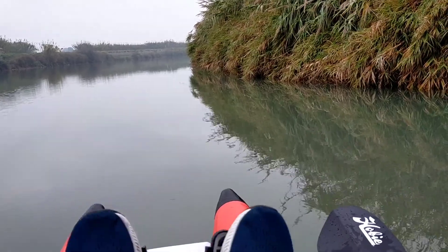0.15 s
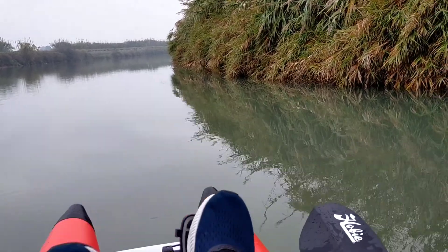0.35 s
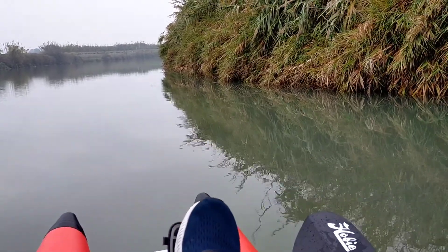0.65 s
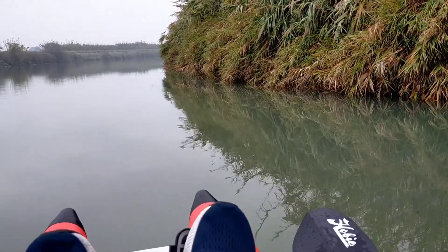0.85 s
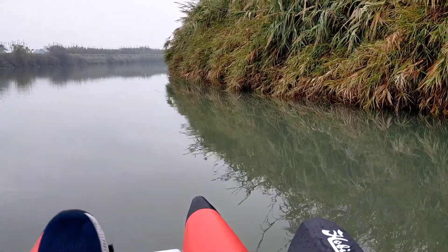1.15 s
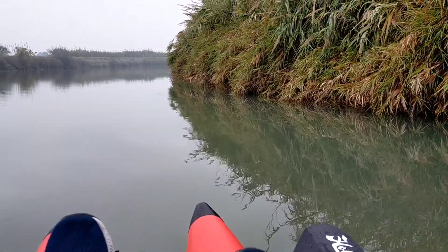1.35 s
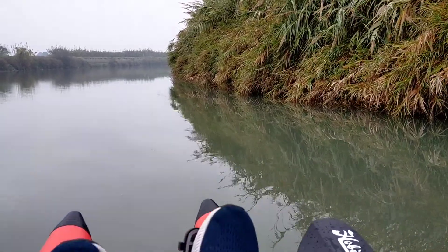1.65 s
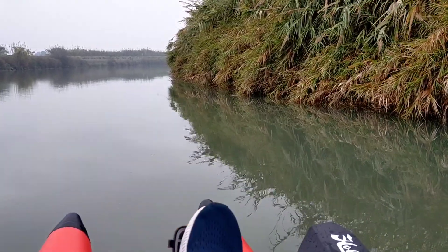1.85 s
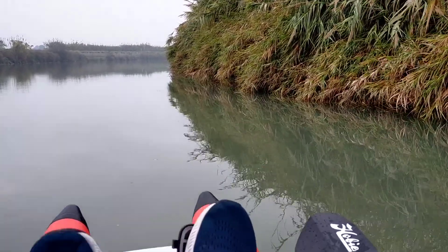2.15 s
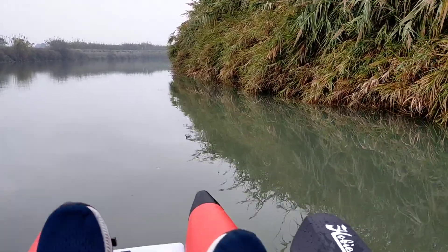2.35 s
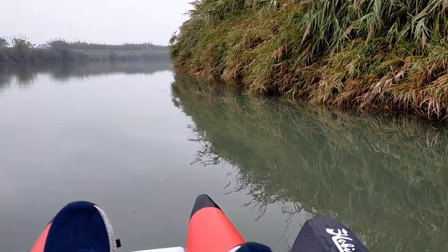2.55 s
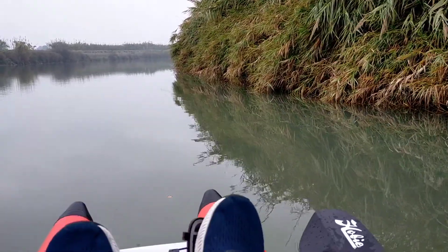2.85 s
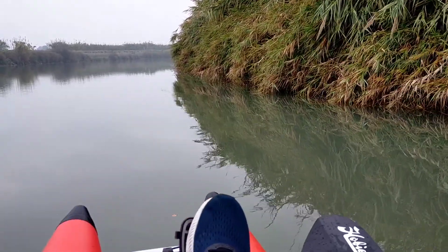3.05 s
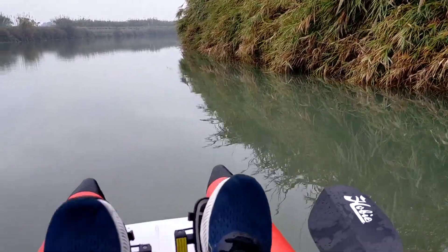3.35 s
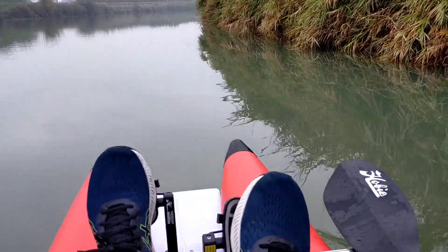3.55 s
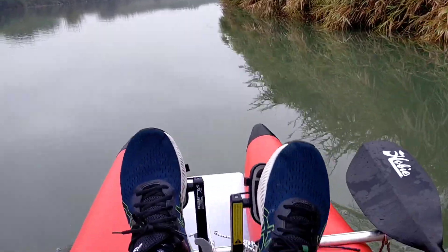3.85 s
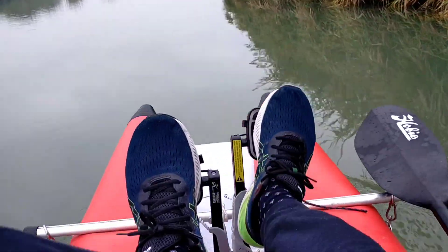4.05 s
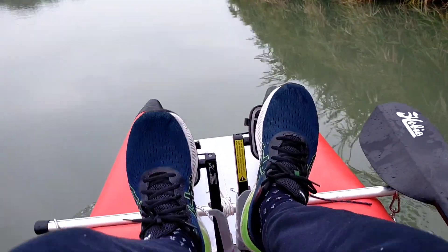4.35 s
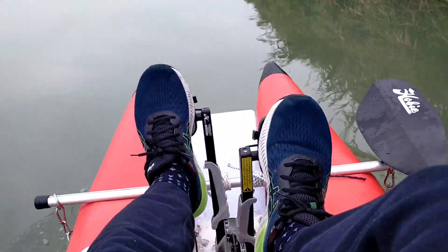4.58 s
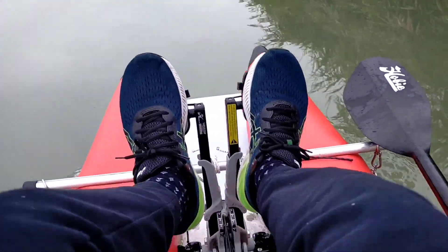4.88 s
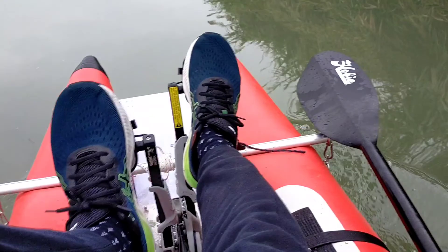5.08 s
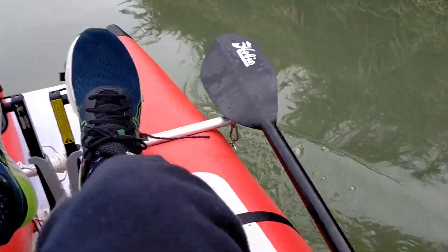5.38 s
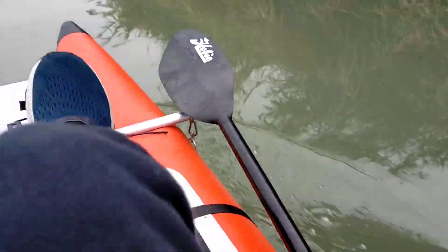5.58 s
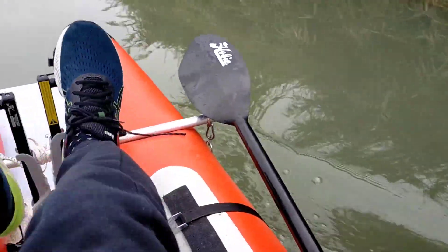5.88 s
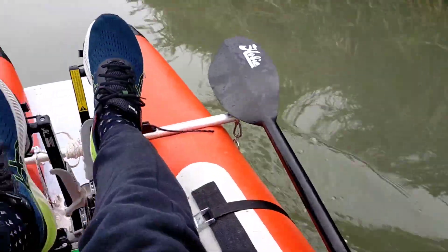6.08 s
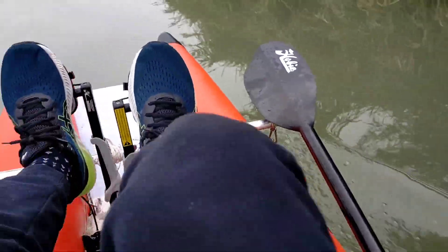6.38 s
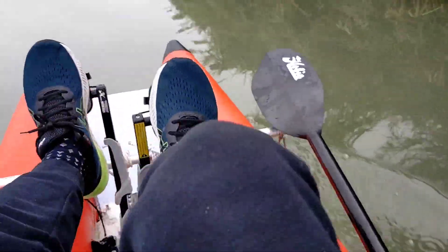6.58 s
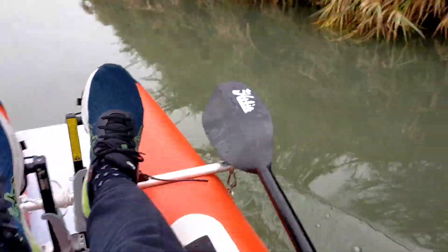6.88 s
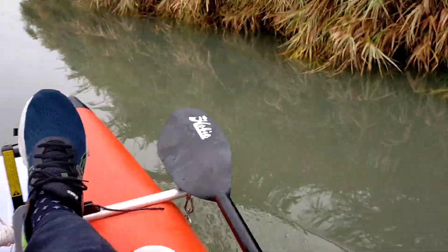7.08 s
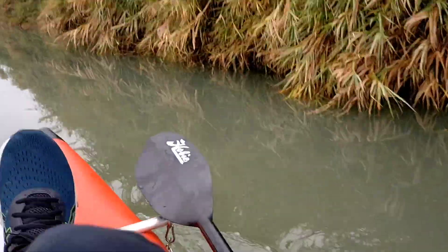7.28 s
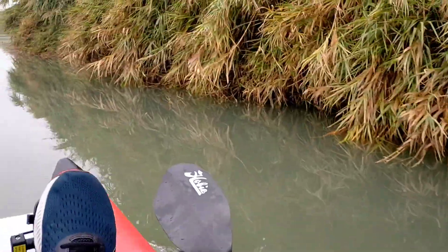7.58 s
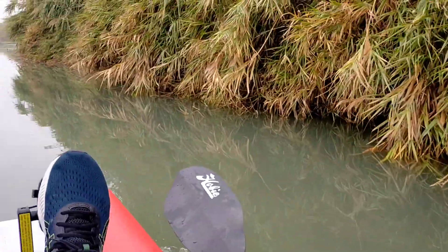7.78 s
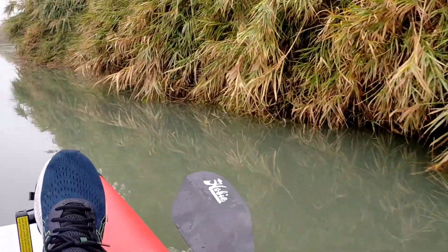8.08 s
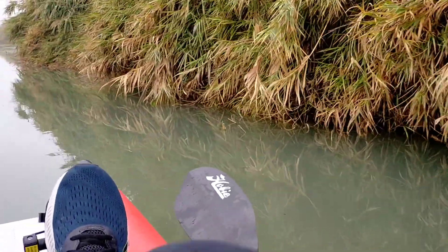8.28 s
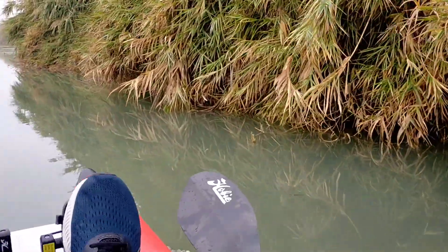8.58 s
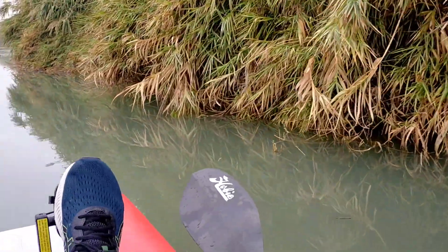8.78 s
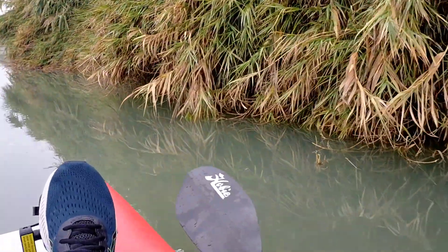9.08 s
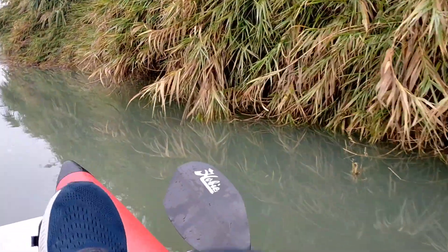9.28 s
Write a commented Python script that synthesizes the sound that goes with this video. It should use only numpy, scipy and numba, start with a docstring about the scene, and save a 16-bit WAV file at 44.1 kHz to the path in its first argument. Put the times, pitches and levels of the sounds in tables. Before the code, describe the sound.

Outdoors on a calm river, a microphone at the seat of an inflatable pedal boat. From 0 s, low wind rumble and quick, fluttering buffets press on the microphone in irregular gusts, densest until about 4.5 s. Beneath them the wake babbles softly along the pontoons, with an opening gurgle, small plops, fine spray and distant river murmur. Short, dry, woody pedal-drive knocks come near 0, 1.4, 1.7, 2.6, 3.8 (strongest), 4.7, 5.7, 6.6, 7.6 and 8.5 s. From 3 to 5.5 s the wake grows louder and closer; a faint hiss passes around 4 to 5 s, and low bubbles gulp between the hulls, with a fuller gurgle near 5.2 s. Faint rising glugs occur near 5.9, 6.8 and 8.1 s. Wind eases after 5 s, with shorter gusts around 7.3 and 8.1 s. Clear plops stand out at 7.7 and 8.4 s; wind swells again from 8.8 s until the end at 9.4 s.

```python
"""A pedal boat on two inflatable pontoons glides along a calm river, heard from the seat.
From the start bubbles resonate in the wake, air gurgles under the hulls, spray ticks, the river murmurs
and eddies of wind press on the microphone. The slack pedal drive knocks, exciting damped modes; larger
bubbles plop and droplets tick and ring. The wake then grows louder; from about 4 s a faint band of noise
fades in and out and low bubbles gulp between the hulls; from about 6 s air pockets glug, rising in pitch."""
import sys
import numpy as np
from scipy import signal
from scipy.fft import rfft, irfft, next_fast_len
from scipy.io import wavfile
from scipy.ndimage import uniform_filter1d
from numba import njit

SR = 44100
rng = np.random.default_rng(int(sys.argv[2]) if len(sys.argv) > 2 else 0)


def generate_wav(signal):
    """Clip the signal to [-1, 1] and save it as 16-bit WAV at the path in sys.argv[1]."""
    frames = np.transpose(np.atleast_2d(signal))
    scaled = np.clip(frames, -1, 1) * 32767
    pcm = np.round(scaled).astype(np.int16)
    wavfile.write(sys.argv[1], SR, pcm)


N = 415863
TIME = np.arange(N) / SR

# spectrum of the fine spray and of droplet impacts: (frequency [Hz], relative density [dB per Hz])
SPRAY_SPECTRUM = [(2800, -15), (4200, -6.5), (5500, -8), (6600, -3), (7700, -0.5), (9000, -10),
                  (10000, -9.5), (11500, -8), (13000, -5.5), (14300, 0), (15300, 5.5), (16000, 0.5)]


def undb(db):
    """Amplitude gain is ten to the power of decibels over twenty."""
    return 10 ** (np.asarray(db) / 20)


def unit(x):
    """Normalisation: divide a signal by its root mean square."""
    return x / np.sqrt(np.mean(x ** 2))


def curves(table):
    """Linear interpolation: each column after the time becomes one value per sample."""
    seconds, *columns = np.transpose(table)
    return [np.interp(TIME, seconds, column) for column in columns]


def colour(x, spectrum):
    """Linear filtering: shape a sound in frequency, falling 12 dB per octave above the last point; rms 1."""
    hz, db = np.transpose(spectrum)
    f = np.maximum(np.arange(N // 2 + 1) * SR / N, 1)
    rolloff = np.minimum(hz[-1] / f, 1) ** 2
    gain = undb(np.interp(np.log(f), np.log(hz), db)) * rolloff
    # zero padding keeps the end of the sound from wrapping round to its start
    size = next_fast_len(N + SR // 10, True)
    gain = np.interp(np.arange(size // 2 + 1) * SR / size, f, gain)
    return unit(irfft(rfft(x, size) * gain, size)[:N])


def walk(rate):
    """Low-pass noise: random levels, about rate [1/s] of them, smoothed into a wander of spread 1."""
    k = max(int(SR / rate), 2)
    steps = np.repeat(rng.standard_normal(N // 20)[:N // k + 1], k)
    return unit(uniform_filter1d(steps, k)[:N])


def swell(start, hold, attack, release):
    """Piecewise-linear envelope [s]: reaches 1 at the start after its attack, holds and falls away."""
    corners = start + np.array([-attack, 0, hold, hold + release])
    return np.interp(TIME, corners, [0, 1, 1, 0])


@njit
def ring(start, hz, cycles, size, glide):
    """Bubble resonance: each swells, decays with a time constant in cycles and rises in pitch."""
    out = np.zeros(N)
    for k in range(len(start)):
        life = cycles[k] / hz[k] * SR  # time constant in samples
        first, phase = int(start[k] * SR), 0.
        for i in range(max(min(int(9 * life), N - first), 0)):
            age = i / life
            phase += 2 * np.pi * hz[k] / SR * (1 + glide * age)
            out[first + i] += size[k] * age * np.exp(1 - age) * np.sin(phase)
    return out


def bubbles(count, low_hz, high_hz, cycles, scatter_db, glide):
    """Superposition: a cloud of bubble resonances between two pitches, a few much stronger than the rest."""
    when, pitch, damping, strength = rng.random((count, 4)).T
    hz = low_hz + (high_hz - low_hz) * pitch
    rings = cycles * 2 ** (2 * damping - 1)  # up to twice or down to half
    level_db = -scatter_db * np.log(strength + .01)
    size = undb(level_db) * np.sqrt(hz / rings)
    return ring(when * N / SR, hz, rings, size, glide)


def single_bubbles(table, cycles, glide):
    """Damped resonance of separate bubbles, one per row of (time [s], peak [dB], starting pitch [Hz])."""
    seconds, db, hz = np.array(table, float).T.copy()
    return ring(seconds, hz, np.full(len(seconds), cycles * 1.), undb(db), glide)


def laps(per_second, decay_s, scatter_db):
    """Shot noise: ripples break at random moments, each at once, and drain exponentially; rms 1."""
    chance, strength = rng.random((2, N))
    breaks = (chance < per_second / SR) * undb(scatter_db * strength) ** 2
    energy = signal.lfilter([1], [1, -np.exp(-1 / (decay_s * SR))], breaks) + 1e-6
    # the flow feeds the ripples evenly, so a big one leaves less for its neighbours
    return unit(np.sqrt(energy / uniform_filter1d(energy, size=SR // 6)))


def flow():
    """Amplitude modulation: the wake's level and its lift by wavelets [dB], quick to rise, slower to drain."""
    # wake along the pontoons, louder once the microphone is turned down to the water:
    # (time [s], relative level [dB])
    wake_level = [(0, -51.5), (1.1, -53.5), (2.0, -52), (3.0, -48.5), (3.65, -49), (4.0, -47.5), (4.9, -46),
                  (5.5, -44), (6.3, -44.5), (7.0, -43.5), (8.2, -44), (9.43, -44)]
    # wavelets that slap along a tube and lift the wake: (time of the crest [s], lift [dB])
    wavelets = [(0.02, 7.5), (0.42, 2.5), (0.8, 6), (1.39, 5), (1.46, 6), (1.7, 1.5), (2.11, 4),
                (2.24, 3.5), (2.63, 4.5), (2.81, 2), (3.33, 3), (3.95, 4.5), (4.29, 5.5), (4.7, 0.5),
                (5.44, 1.5), (5.52, 2.5), (6.62, 2.5), (6.97, 3), (7.27, 3.5), (8.4, 4), (9.11, 2)]
    level_db, = curves(wake_level)
    lift_db = sum(lift * swell(s, hold=0, attack=0.045, release=0.1) for s, lift in wavelets)
    return level_db, lift_db


def wake(lapping, babble_db, wash_db):
    """Bubble resonance: breaking ripples free bursts of bubbles over the wash of countless smaller ones."""
    # spectrum of the wake: (frequency [Hz], relative density [dB per Hz])
    babble_spectrum = [(300, -3.5), (600, -9), (800, -3.5), (1080, 0.5), (1300, -1), (1700, 0.5),
                       (2100, -1), (2600, -6), (3100, -13), (3700, -24.5), (4600, -26.5), (6000, -33)]
    level_db, lift_db = flow()
    cloud = bubbles(count=13000, low_hz=498, high_hz=4288, cycles=3.15, scatter_db=3.5, glide=0.0083)
    babble = colour(cloud * lapping, babble_spectrum)
    wash = colour(rng.standard_normal(N), babble_spectrum)
    return undb(level_db + lift_db) * (undb(babble_db) * babble + undb(wash_db) * wash)


def churn(lapping, gurgle_db, spray_db, hiss_db, scatter_db):
    """Bubble resonance: large air pockets gurgle low, tiny droplets tick and ring high over a smooth hiss."""
    # air gurgling under the hulls: (time [s], level [dB])
    gurgle_level = [(0, -44.5), (0.4, -70), (1.0, -60), (1.4, -58), (3.7, -60), (4.3, -52.5), (5.0, -52.5),
                    (5.17, -44.5), (5.5, -50.5), (6.1, -46.5), (6.8, -51), (7.9, -47), (8.45, -49.5),
                    (9.43, -53.5)]
    # spectrum of the gurgle: (frequency [Hz], relative density [dB per Hz])
    gurgle_spectrum = [(170, -35), (250, 1), (330, 2.5), (500, -0.5), (620, -4.5), (900, -25), (1600, -40)]
    low_db, = curves(gurgle_level)
    cloud = bubbles(count=4000, low_hz=205.2, high_hz=911, cycles=1.65, scatter_db=4.5, glide=0.0033)
    gurgle = colour(cloud, gurgle_spectrum)

    level_db, lift_db = flow()
    top_db = level_db + 0.46 * lift_db  # only a share of a wavelet's lift reaches the spray
    hits = rng.random(N) < 700 / SR  # about 700 droplet impacts a second
    impacts = hits * undb(-scatter_db * np.log(rng.random(N) + .01))
    fizz = bubbles(count=9000, low_hz=2960, high_hz=15720, cycles=5.3, scatter_db=4.0, glide=0.0027)
    spray = undb(spray_db) * colour((unit(impacts) + unit(fizz)) * lapping, SPRAY_SPECTRUM)
    hiss = undb(hiss_db) * colour(rng.standard_normal(N), SPRAY_SPECTRUM)
    return undb(low_db + gurgle_db) * gurgle + undb(top_db) * (spray + hiss)


def river(level_db, wander_db):
    """Incoherent sum of distant sources: far water and reeds make a soft, slowly wandering noise bed."""
    # spectrum of the open river further off: (frequency [Hz], relative density [dB per Hz])
    river_spectrum = [(200, -3), (500, -5.5), (850, 3.5), (1300, -11), (2200, -14.5), (3100, -11.5),
                      (4000, -28)]
    return undb(level_db + wander_db * walk(5)) * colour(rng.standard_normal(N), river_spectrum)


def airflow(wander_db, eddy_wander_db):
    """Energy addition: gusts add to a restless breeze; levels [dB] of slow rumble and fast eddies."""
    # headwind on the microphone, weaker while it points down:
    # (time [s], relative slow rumble level [dB], relative fast eddy level [dB])
    breeze = [(0, -38, -48), (0.85, -36, -42.5), (1.1, -42, -46.5), (1.8, -39, -46.5), (2.6, -37, -43),
              (3.3, -38, -42.5), (4.7, -40, -47), (5.4, -37.5, -46), (5.85, -46.5, -56.5),
              (6.3, -39.5, -47.5), (7.1, -42, -53.5), (7.8, -41, -55), (8.45, -44.5, -59), (8.85, -32, -41),
              (9.43, -37, -40)]
    # gusts: (time of full strength [s], hold [s], relative rumble level [dB], relative buffet level [dB])
    gusts = [(0.157, 0.019, -36, -25.5), (0.234, 0.091, -40, -33.5), (0.491, 0.12, -28, -38.5),
             (0.649, 0.047, -31, -33), (1.305, 0.23, -30, -30), (1.621, 0.013, -56, -32.5),
             (1.728, 0.023, -34.5, -30), (1.93, 0.068, -38, -36.5), (2.019, 0.047, -40, -28),
             (2.129, 0.034, -46, -34), (2.385, 0.042, -28.5, -31), (2.66, 0.037, -36, -28),
             (2.778, 0.09, -34.5, -31.5), (2.914, 0.055, -39, -31.5), (3.156, 0.12, -40, -41),
             (3.506, 0.12, -32, -30.5), (3.662, 0.15, -34.5, -33.5), (3.922, 0.074, -32, -30),
             (4.10, 0.03, -32.5, -34), (4.238, 0.09, -40, -35.5), (4.406, 0.16, -32, -40),
             (4.831, 0.15, -29, -40), (5.995, 0.14, -44, -45.5), (6.677, 0.3, -44, -55),
             (7.268, 0.032, -28.5, -44), (7.448, 0.047, -31.5, -31.5), (8.023, 0.052, -34.5, -37),
             (8.218, 0.031, -35, -43.5)]
    slow_db, fast_db = curves(breeze)
    restless = np.tanh(walk(15))
    slow = undb(slow_db + wander_db * restless) ** 2
    fast = undb(fast_db + eddy_wander_db * restless) ** 2
    for s, length, rumble_db, buffet_db in gusts:
        gust = swell(s, length, attack=0.014, release=0.03)
        slow = slow + (undb(rumble_db) * gust) ** 2
        fast = fast + (undb(buffet_db) * gust) ** 2
    return 10 * np.log10(slow), 10 * np.log10(fast)


def wind(rumble_db, eddy_db, flutter_db, buffet_db, hard_db, steepness):
    """Turbulent pressure: large eddies push slowly on the microphone, small ones in quick, uneven buffets."""
    # spectra of large, small and finest eddies: (frequency [Hz], relative density [dB per Hz])
    rumble_spectrum = [(4, -9), (12, -3.5), (25, 0.5), (50, -2), (80, -8), (120, -15.5), (200, -25),
                       (400, -76)]
    eddy_spectrum = [(40, -1), (80, 2.5), (115, 0.5), (160, -7), (230, -25), (400, -29), (800, -62)]
    hard_spectrum = [(70, -20), (140, 1.5), (210, 2), (300, -3), (450, -20), (800, -17), (2000, -58)]
    slow_db, fast_db = airflow(wander_db=-0.5, eddy_wander_db=3.0)
    rumble = colour(rng.standard_normal(N), rumble_spectrum) * undb(slow_db + rumble_db)
    unevenness_db = flutter_db * np.tanh(walk(130)) + buffet_db * np.tanh(walk(35))
    strength = undb(fast_db + unevenness_db)
    turbulence = rng.standard_normal(N)
    eddies = colour(turbulence, eddy_spectrum) * strength * undb(eddy_db)
    # the finest eddies grow faster than the gust, so strong buffets are also brighter
    hard = unit(colour(turbulence, hard_spectrum) * strength ** steepness) * undb(hard_db)
    return rumble + eddies + hard


def knocks(knock_db, contact_hz, rattle_db, rattle_t60, echo_s, echo_db):
    """Impact excites damped modes: drive slack is taken up, the deck echoes the blow, the frame rattles."""
    # knocks of the pedal drive: (time [s], relative level [dB], pitch of the contact [ratio])
    knock_events = [(0.0236, -22.5, 0.87), (1.3772, -13.5, 0.95), (1.731, -19.5, 0.97), (2.6125, -13, 0.94),
                    (3.7848, -7.5, 1.07), (4.7138, -17, 0.92), (5.714, -11.5, 0.85), (6.6029, -11, 0.85),
                    (7.5842, -13, 0.86), (8.5020, -13.5, 0.95)]
    # ring of the drive and its frame: (frequency at pitch ratio 1 [Hz], relative level [dB], T60 [s])
    drive_modes = [(373, -18.5, 0.01), (730, -17, 0.012), (1133, -0.5, 0.0066), (1356, -34, 0.014),
                   (1980, -2, 0.0027), (2370, -27, 0.0025), (6250, -2, 0.0091)]
    out, t = np.zeros(N + SR), np.arange(SR // 10) / SR
    frame = signal.butter(4, [350, 3000], "bandpass", fs=SR, output="sos")
    for s, db, pitch in knock_events:
        modes = np.zeros(len(t))
        for hz, mode_db, t60 in drive_modes:
            decay = np.exp(-np.log(1000) * t / t60)
            modes += undb(mode_db) * decay * np.cos(2 * np.pi * hz * pitch * t)
        # a harder contact rings higher and lets more treble through
        cutoff_hz = min(contact_hz * pitch ** 2, SR / 3)
        soften = signal.butter(3, cutoff_hz, fs=SR, output="sos")
        blow = signal.sosfilt(soften, -modes)
        blow = blow + undb(echo_db) * np.interp(t - echo_s, t, blow, left=0)
        rattle = unit(signal.sosfilt(frame, rng.standard_normal(len(t))))
        rattle = rattle * np.exp(-np.log(1000) * t / rattle_t60)
        knock = blow / np.abs(blow).max() + undb(rattle_db) * rattle
        first = int(s * SR)
        out[first:first + len(t)] += undb(db + knock_db) * knock
    return out[:N]


def plops(level_db):
    """Damped bubble resonance: larger bubbles plop out of the wake with a very slight rise in pitch."""
    # larger bubbles: (time [s], relative level [dB], starting pitch [Hz])
    plop_events = [(0.078, -30.5, 1520), (0.132, -35.5, 860), (0.307, -30.5, 1470), (0.612, -30, 914),
                   (0.844, -29.5, 1480), (0.962, -36.5, 900), (1.262, -36, 940), (1.445, -32, 1580),
                   (1.471, -30, 1960), (1.834, -35, 960), (2.102, -30.5, 2090), (2.212, -27, 1800),
                   (2.396, -27, 2240), (2.618, -26, 2410), (2.732, -30.5, 1570), (2.832, -32, 1090),
                   (3.384, -27.5, 2620), (3.974, -26, 1260), (4.01, -29, 1220), (4.275, -29, 930),
                   (4.695, -26, 1520), (5.257, -26.5, 1630), (5.438, -22.5, 2060), (5.485, -28, 1890),
                   (6.975, -27, 1410), (7.675, -16.5, 1740), (7.988, -25, 1600), (8.2, -22, 2100),
                   (8.421, -14, 1650), (8.566, -22.5, 1580), (8.937, -22.5, 1680), (9.236, -24.5, 1440)]
    return undb(level_db) * single_bubbles(plop_events, cycles=1.7, glide=.01)


def droplets(ring_db, tick_db):
    """Impact and resonance: a drop ticks on the surface and leaves a tiny ringing bubble."""
    # single droplets falling back: (time [s], relative level [dB], starting pitch [Hz])
    drop_events = [(0.4736, -33, 13800), (0.71, -37, 6300), (0.754, -29.5, 14100), (1.5433, -28.5, 15500),
                   (2.067, -30, 14600), (2.679, -32, 14700), (3.273, -40, 7100), (3.924, -24.5, 16300),
                   (4.5157, -27.5, 15700), (4.778, -37, 7090), (5.2387, -35, 7550), (5.4383, -26, 14800),
                   (7.7184, -34, 14100), (8.0866, -29.5, 11000), (8.441, -28, 15800), (9.148, -24, 14900)]
    impacts = np.zeros(N)
    for s, db, _ in drop_events:
        impacts[int(s * SR)] = undb(db)
    decay = np.exp(-np.arange(SR // 100) / SR / 0.0038)  # time constant 3.8 ms
    splat = rng.standard_normal(SR // 100) * decay
    ticks = signal.oaconvolve(impacts, splat)[:N]
    ticks = ticks.std() * colour(ticks, SPRAY_SPECTRUM)
    rings = single_bubbles(drop_events, cycles=2.9, glide=.002)
    return undb(tick_db) * ticks + undb(ring_db) * rings


def narrow_noise(level_db, start_s, length_s):
    """Band-limited noise: a faint narrow band around 3.6 to 4.6 kHz fades in and out."""
    # spectrum of the band: (frequency [Hz], relative density [dB per Hz])
    band_spectrum = [(2500, -16), (3600, 0), (4600, -2), (5200, -13), (7000, -40)]
    envelope = swell(start_s, length_s, attack=0.05, release=0.17)
    return undb(level_db) * envelope * colour(rng.standard_normal(N), band_spectrum)


def gulps(level_db):
    """Damped resonance: bubbles gulp low between the hulls, swelling for a cycle, dying in a few more."""
    # low gulps: (time [s], relative level [dB], starting pitch [Hz])
    gulp_events = [(4.159, -30.5, 397), (4.598, -33, 403), (5.089, -34, 630), (5.153, -31, 297),
                   (5.216, -32, 370), (5.256, -34, 357), (5.602, -30.5, 410), (6.699, -33.5, 450),
                   (7.63, -32, 308), (7.949, -32, 490), (8.471, -31, 307), (8.507, -31, 436),
                   (8.575, -32, 387)]
    return undb(level_db) * single_bubbles(gulp_events, cycles=1.18, glide=.02)


def glugs():
    """Rising resonance: air pockets close under a hull, close by, and their note climbs as it fades."""
    # closing air pockets: (time [s], peak [dB], starting pitch [Hz])
    glug_events = [(5.894, -36.5, 630), (6.78, -41, 800), (8.06, -41, 1240)]
    return single_bubbles(glug_events, cycles=11, glide=0.36)


def scene():
    """Superposition: water, drive and wind add at one microphone in the open air."""
    lapping = laps(per_second=55, decay_s=0.02, scatter_db=13)
    water = wake(lapping, babble_db=-0.1, wash_db=-3.5)
    water = water + churn(lapping, gurgle_db=0, spray_db=-11, hiss_db=-13.0, scatter_db=3.5)
    distance = river(level_db=-60, wander_db=3.0)
    air = wind(rumble_db=0.1, eddy_db=-3.0, flutter_db=8.0, buffet_db=2.0, hard_db=-50, steepness=1.27)
    drive = knocks(knock_db=-2.7, contact_hz=2410, rattle_db=-25, rattle_t60=0.045,
                   echo_s=0.00387, echo_db=-10.5)
    drops = plops(level_db=-2) + droplets(ring_db=1.0, tick_db=-14.5)
    band = narrow_noise(level_db=-65, start_s=3.85, length_s=1)
    hollows = gulps(level_db=-2.0) + glugs()
    return (water + distance + air + drive + drops + band + hollows)[None]


def record(dry):
    """Low-pass filtering: the recorder cuts the very top, above 15.6 kHz."""
    lowpass = signal.ellip(10, .2, 70, 15600, fs=SR, output="sos")
    return signal.sosfilt(lowpass, dry)


dry = scene()
out = record(dry)
generate_wav(out)
```